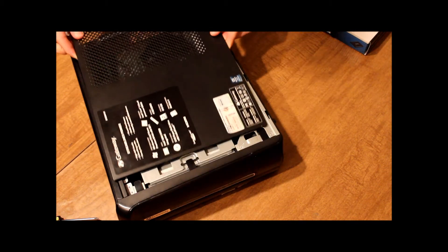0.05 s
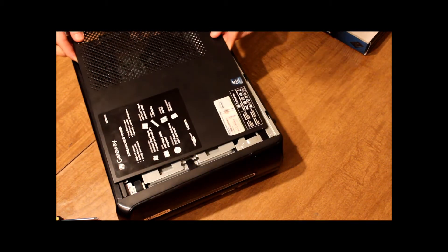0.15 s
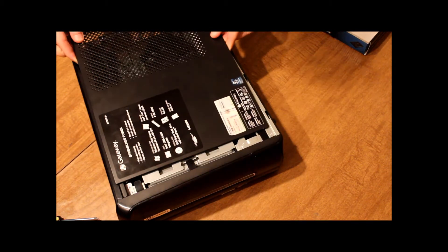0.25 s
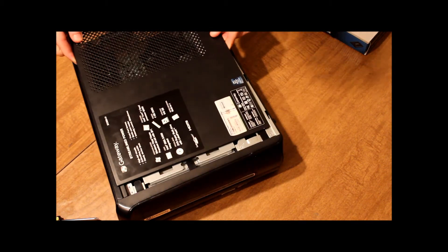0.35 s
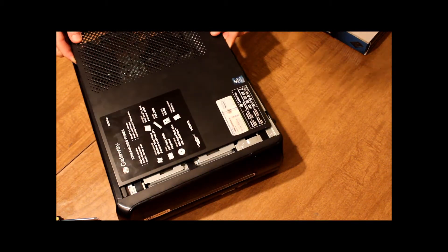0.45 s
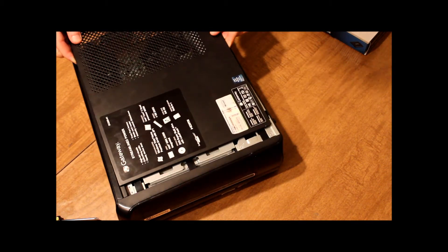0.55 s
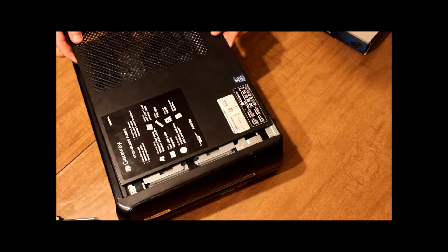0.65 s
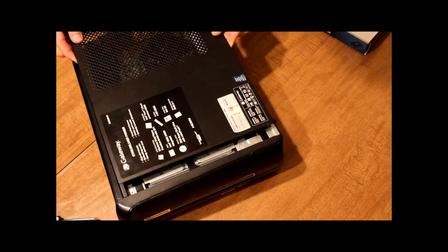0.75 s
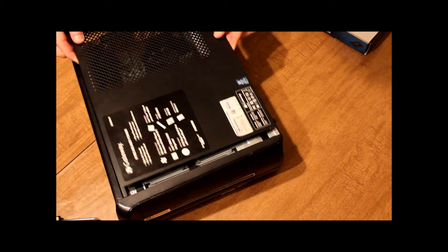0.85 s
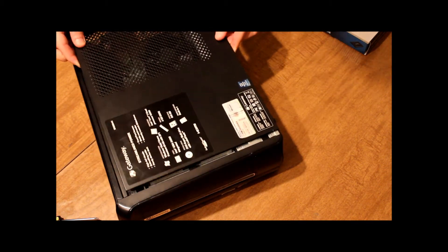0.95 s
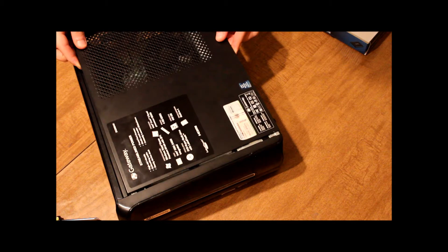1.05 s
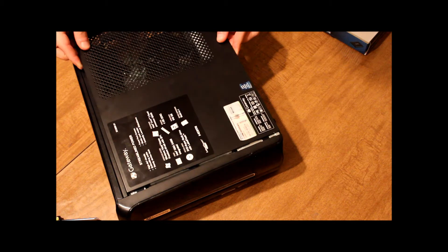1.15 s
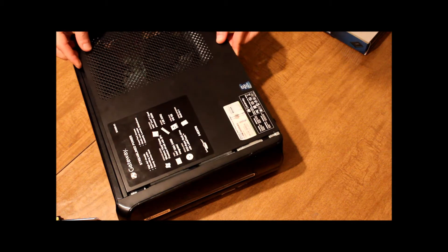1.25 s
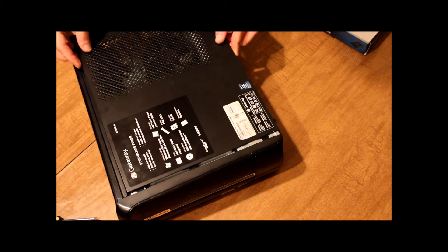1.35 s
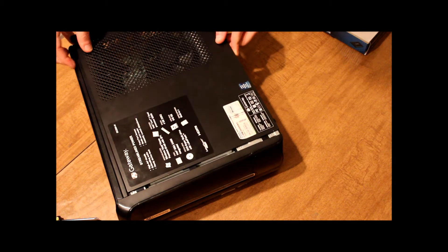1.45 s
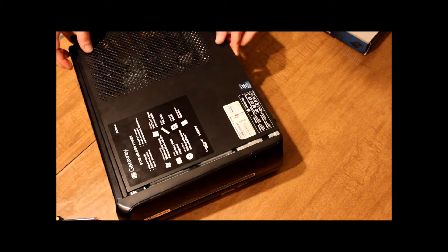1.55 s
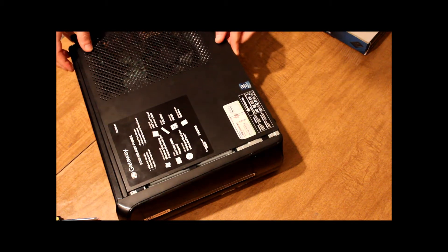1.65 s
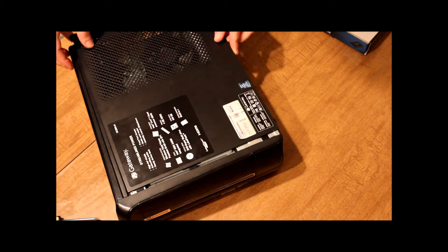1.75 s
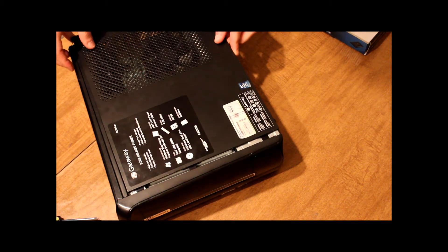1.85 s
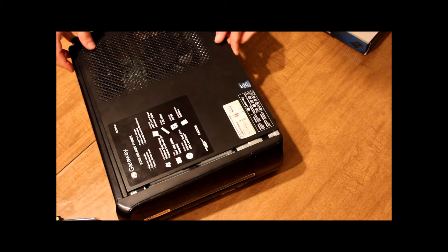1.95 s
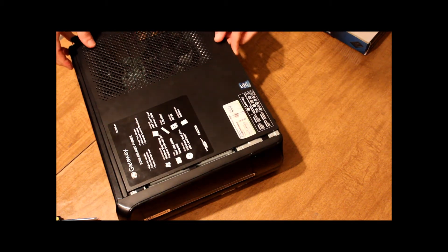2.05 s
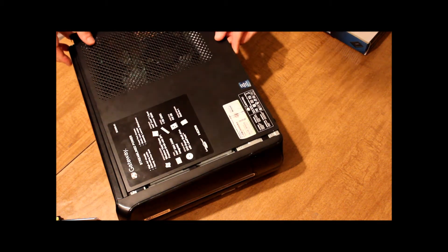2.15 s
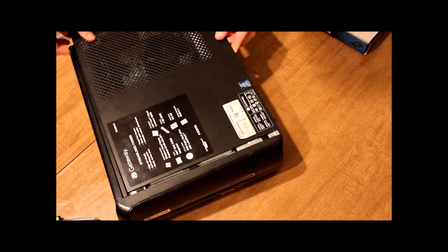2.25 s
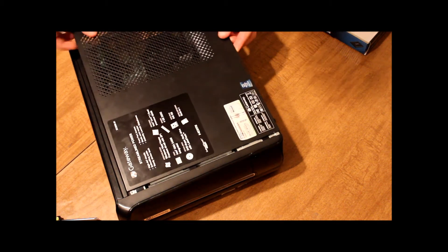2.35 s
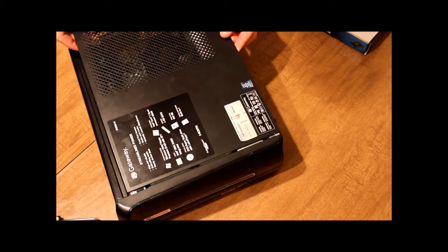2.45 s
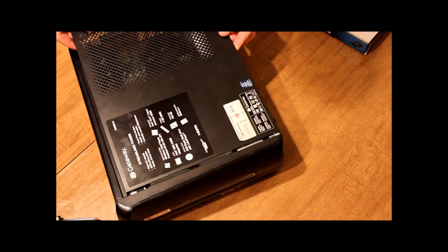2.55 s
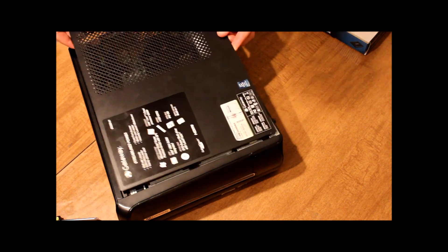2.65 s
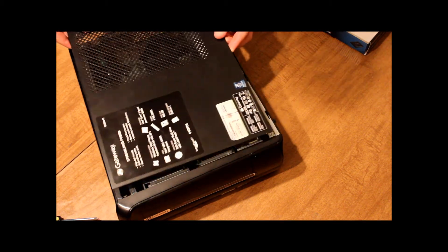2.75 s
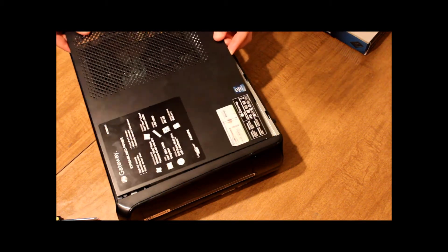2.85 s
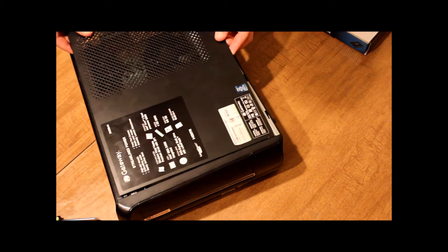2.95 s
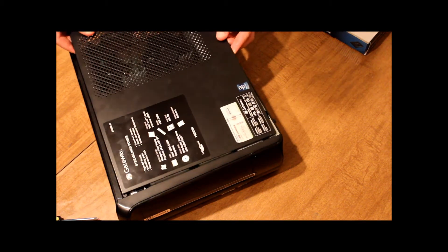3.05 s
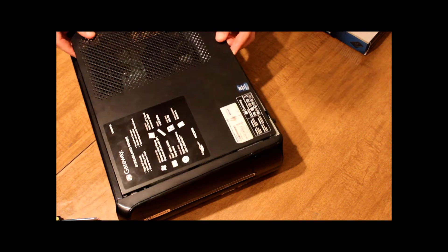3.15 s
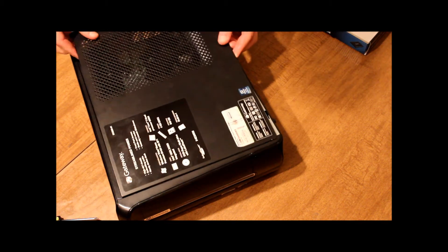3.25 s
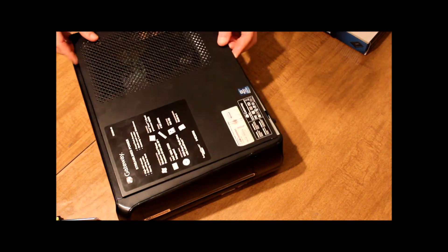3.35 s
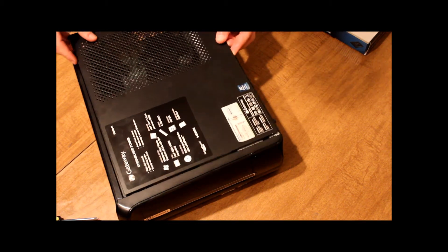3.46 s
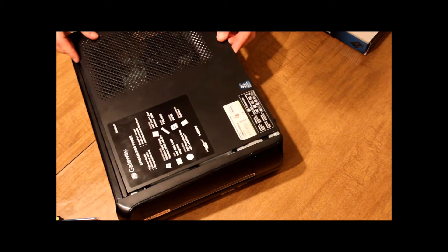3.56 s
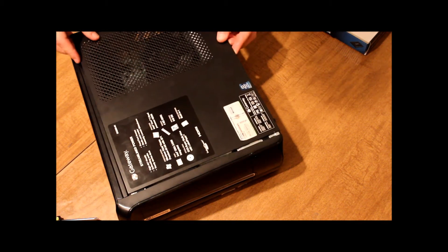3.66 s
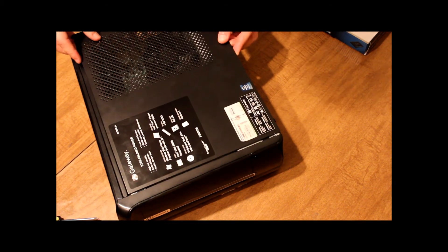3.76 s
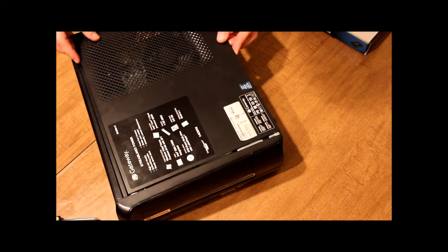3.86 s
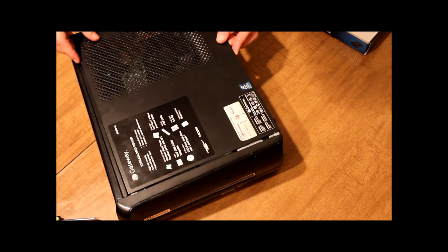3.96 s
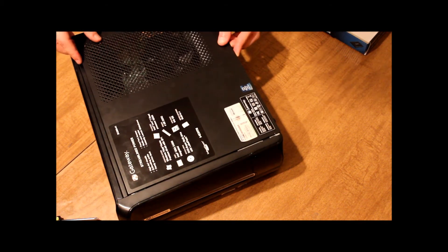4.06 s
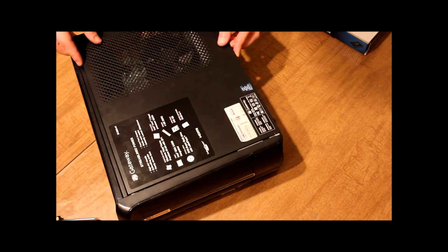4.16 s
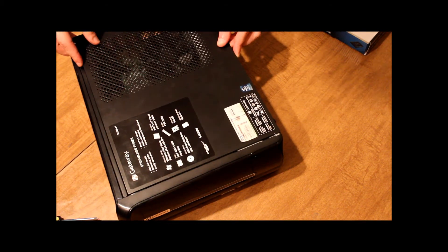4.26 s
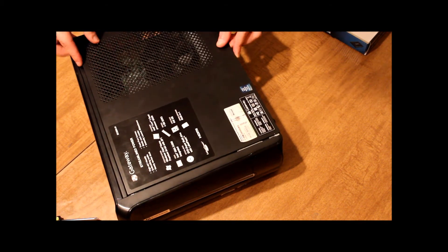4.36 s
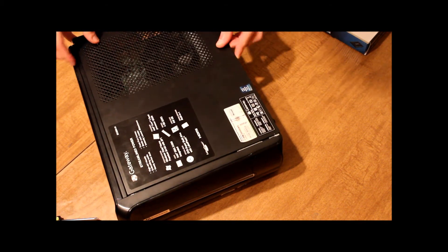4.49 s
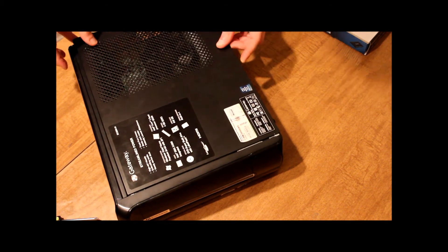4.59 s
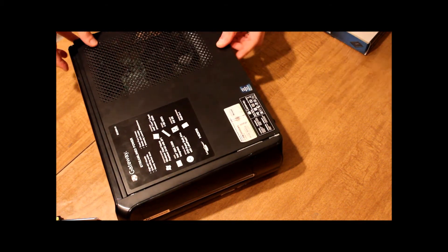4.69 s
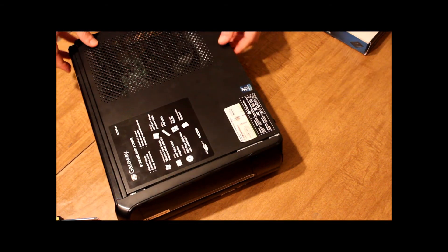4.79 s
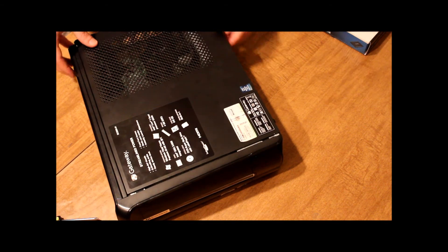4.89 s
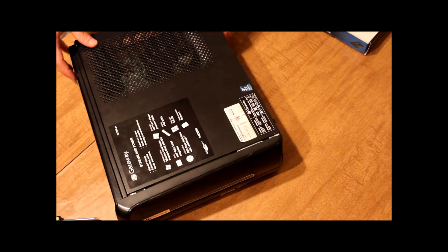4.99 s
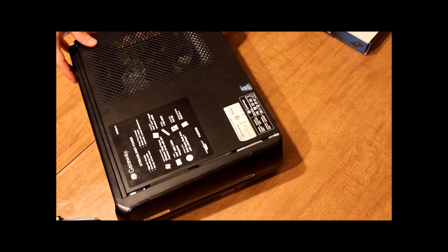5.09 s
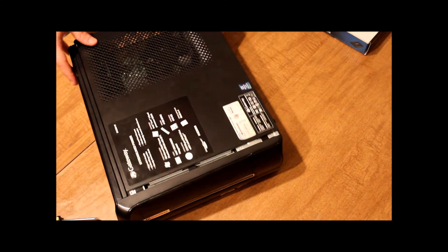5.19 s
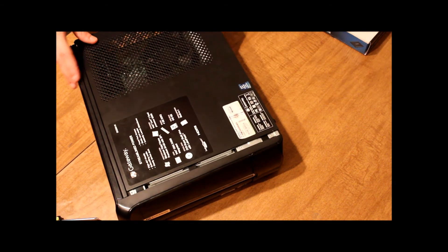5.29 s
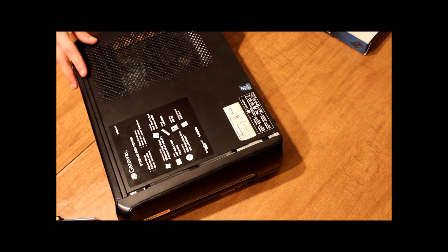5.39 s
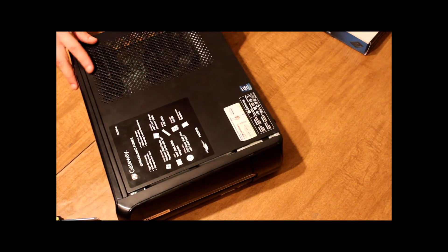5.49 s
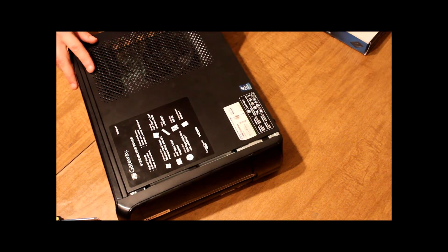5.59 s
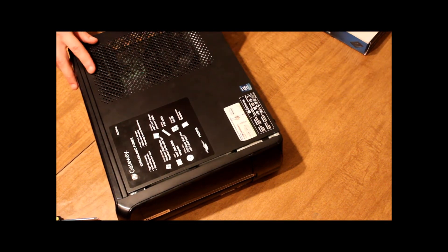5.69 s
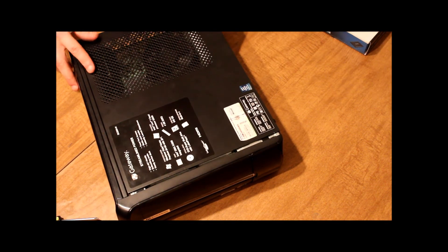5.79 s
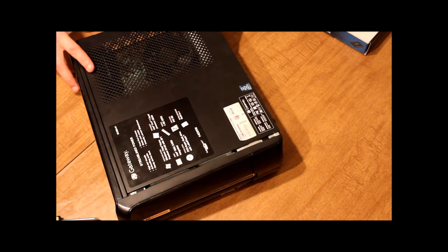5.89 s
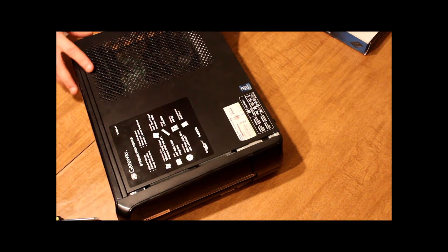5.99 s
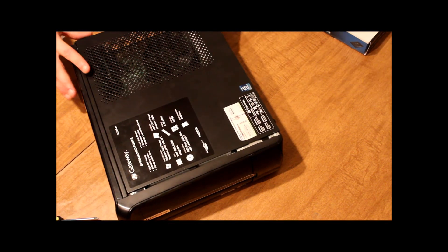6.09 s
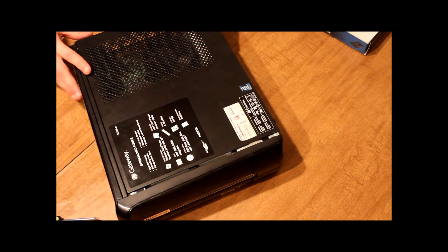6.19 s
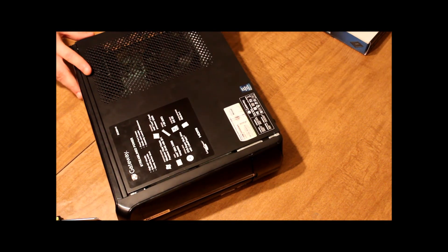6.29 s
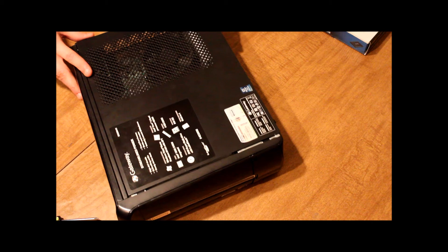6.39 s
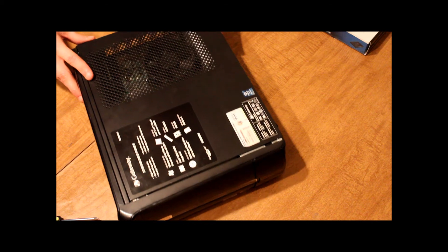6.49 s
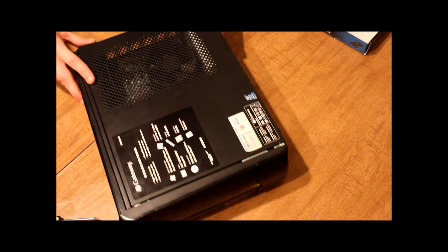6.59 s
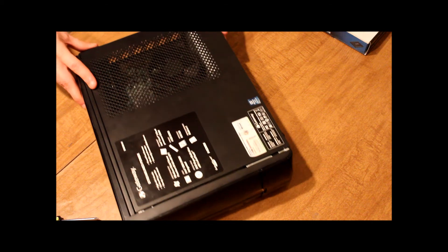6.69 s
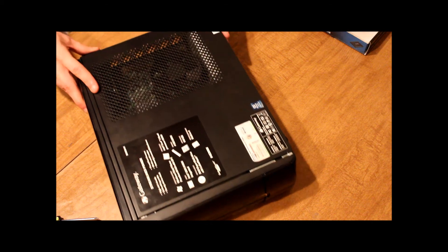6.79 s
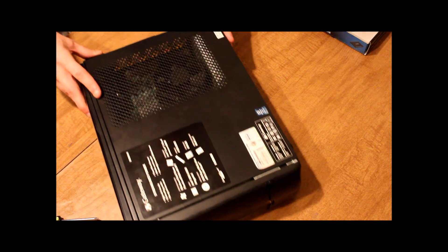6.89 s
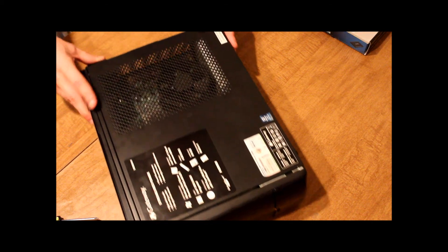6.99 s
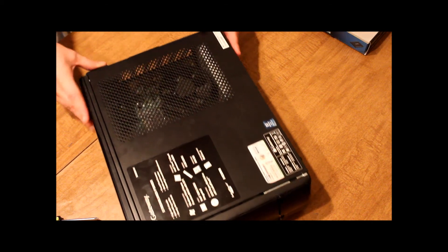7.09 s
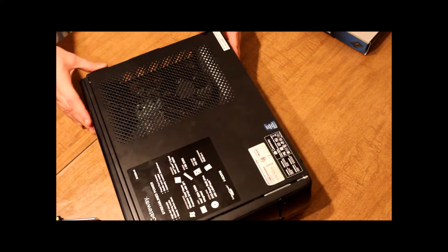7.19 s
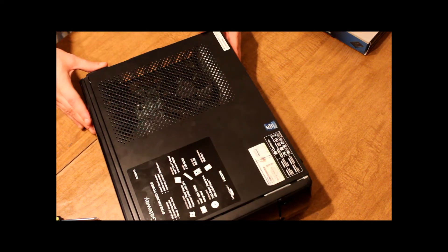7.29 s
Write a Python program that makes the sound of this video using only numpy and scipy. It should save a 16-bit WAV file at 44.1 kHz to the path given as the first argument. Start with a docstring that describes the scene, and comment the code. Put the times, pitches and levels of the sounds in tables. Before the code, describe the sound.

A small room with a soft steady wash, faint hum and deep drone, heard close to a wooden table. From 0.2 to 0.4 s a thin steel panel gives several light clacks against a hollow metal case, then fainter taps. Firmer knocks come at 1.0 and 1.15 s, a bright hard pair at 1.5 s with a short scrape, and another at 1.8 s. Smaller bumps and rattles run from 2.2 to 2.7 s. A strong double clack with low thump lands at 3.0 s, followed by gritty edge scraping, then a dense burst around 3.6-3.7 s. One soft knock at 4.1 s, then solid clunks at 4.9 s and the loudest, sharpest snap at 5.3 s. Only faint taps follow until 6.5 s, when the case turns, its feet juddering in low throbs with hissing rubbing, fading by 7.3 s. Rings are short and hand-damped, with brief room echo.

```python
"""A small room: on a wooden table a steel side panel is set on its computer case, knocked and slid into place.
Then the case is turned on the table. Each contact is a chattering noise burst that rings listed modes and
shakes the sheet, split into six bands; edge strokes and rubbing are coloured noise, the turning feet a throbbing
judder. Decaying random taps make the room's answer; a steady wash, hums and a deep drone lie underneath."""
import sys
import numpy as np
from scipy import signal
from scipy.fft import rfft, irfft, next_fast_len
from scipy.io import wavfile
from scipy.ndimage import uniform_filter1d

SR = 44100
rng = np.random.default_rng(int(sys.argv[2]) if len(sys.argv) > 2 else 0)


def to_wav(s):
    """Save 16-bit WAV."""
    ch = np.atleast_2d(s).T  # columns
    pcm = np.round(np.clip(ch, -1, 1) * 32767)  # PCM
    wavfile.write(sys.argv[1], SR, pcm.astype(np.int16))


N = 323605

# band edges of thud, boom, ring, clank, crack, tick: edge_hz
PART_EDGES_HZ = [45, 150, 450, 900, 3000, 8000, 16500]


def gain_of(db):
    """Decibels to an amplitude factor."""
    return 10 ** (np.asarray(db) / 20)


def evened(x):
    """Scales to rms 1."""
    return x / np.sqrt(np.mean(x ** 2) + 1e-20)


def unit(spectra):
    """Scales each row to energy 1."""
    return spectra / np.linalg.norm(spectra, axis=-1, keepdims=True)


def smooth_noise(size):
    """Noise under a moving average of size samples."""
    return uniform_filter1d(rng.standard_normal(N), size)


def read(points, hz):
    """Interpolates a table on a log-frequency axis."""
    f, value = np.transpose(points)
    return np.interp(np.log(hz + 1), np.log(f + 1), value)


def add(mix, s, sound):
    """Mixes a sound in at s seconds."""
    part = mix[round(s * SR):][:len(sound)]
    part += sound[:len(part)]


def coloured(x, points):
    """Filters x by the table's spectrum; rms 1."""
    size = next_fast_len(len(x))
    gains = gain_of(read(points, np.fft.rfftfreq(size, 1 / SR)))
    return evened(irfft(rfft(x, size) * gains, size)[:len(x)])


def grit(points, rows, rough_db):
    """Friction: coloured noise with an uneven grain, its level following rows (s, dB)."""
    s, db = np.transpose(rows)
    grain = gain_of(rough_db * evened(smooth_noise(200)))
    level = gain_of(np.interp(np.arange(N) / SR, s, db, -120, -120))
    return level * grain * coloured(rng.standard_normal(N), points)


def resonate(x, hz, width_hz):
    """Two-pole resonance: pole radius sets the width, pole angle the pitch."""
    r = np.exp(-np.pi * width_hz / SR)
    return signal.lfilter([1 - r], [1, -2 * r * np.cos(2 * np.pi * hz / SR), r * r], x)


def room_tone():
    """A steady wash of noise, hums of narrowly resonated noise and a wavering sine drone."""
    # wash spectrum: freq_hz, relative_density_db
    wash_spectrum = [(29, -36), (50, -11.5), (167, -7.5), (276, -6.5), (319, -14), (360, -3), (397, -13),
                     (447, -16), (583, -9.5), (922, -13.5), (1570, -19), (1720, -20.5), (2660, -26.5),
                     (3000, -28.5), (15800, -37)]
    # hums: pitch_hz, width_hz, rms_db
    hum_rows = [(126, 9.5, -74.5), (177, 6.4, -96), (353, 6.5, -84), (523.3, 18, -56.5)]
    wash_db, drone_hz, drone_db = -45, 26.8, -51.5
    wash = gain_of(wash_db) * coloured(rng.standard_normal(N), wash_spectrum)
    waver = 1 + 0.25 * evened(smooth_noise(900))
    sine = np.sin(2 * np.pi * drone_hz * np.arange(N) / SR)
    drone = gain_of(drone_db) * np.sqrt(2) * waver * sine
    hums = sum(gain_of(db) * evened(resonate(rng.standard_normal(N), hz, width_hz))
               for hz, width_hz, db in hum_rows)
    return wash + drone + hums


def part_levels(strength_db, weight_db, flat_db, sharp_db):
    """Band levels of a contact: the thud follows its weight, the tick its sharpness."""
    clank_db = -6.5  # clank rms over 20 ms, against its peak
    thud_db = -19.5 + 1.3 * weight_db
    tick_db = -8.5 + 1.2 * sharp_db
    return strength_db + clank_db + np.array([thud_db, weight_db, flat_db, 0, sharp_db, tick_db])


def contacts():
    """Rows (s, chatter ms, six band gains, sharpness dB): knocks fill all bands, jolts and ticks one each."""
    # knocks: start_s, clank_peak_db, then against the clank weight_db (table and case),
    # flatness_db (panel ring), sharpness_db (crack); chatter_ms
    knock_rows = [(0.1817, -27, 0.5, 9, -3.5, 7.8), (0.189, -16.5, -5.5, 2.5, -9.5, 3.5),
                  (0.2637, -23.5, -5, 2.5, -10, 5), (0.294, -26, -4.5, -9, -11, 5.6),
                  (0.3731, -25.5, 1, 4, -20, 5), (0.3949, -34.5, 9, -10, -16, 4.6),
                  (0.7332, -32.5, 5.5, 6.5, -16, 5.8), (0.7587, -37.5, -1, 10.5, -20, 7.6),
                  (0.9888, -16.5, -4, 4, -9.5, 6.2), (1.0194, -31.5, -11, 8, -16, 4.7),
                  (1.0754, -32, -1, -11, -7, 5), (1.1309, -29, -4, -22, -9, 5.6),
                  (1.1403, -17.5, -7, 3, -7.5, 6.6), (1.171, -21.5, 5, 5, -8, 5),
                  (1.1792, -22.5, 1.5, 8.5, -10, 3.7), (1.2132, -23.5, -4, -2.5, -7.5, 3.8),
                  (1.2424, -35, 7, 2, -24, 3.6), (1.3139, -29, -7, -6, -9.5, 13),
                  (1.396, -38, 2, 5.5, -24, 5), (1.496, -25, 3.5, -11, -9, 15),
                  (1.5193, -11, -3.5, -6.5, -5.5, 5), (1.5302, -12, -2.5, -10, -11, 8.5),
                  (1.5578, -22, -7, -7, -9, 4.3), (1.7854, -13.5, -6.5, 0, -12.5, 5.8),
                  (1.8082, -19.5, -1, 4.5, -25, 8.3), (1.8951, -31, 2, -12, -13, 7.3),
                  (2.1816, -22, -8, -9.5, -7.5, 5.7), (2.1955, -20, -6.5, -3, -13.5, 8.3),
                  (2.2906, -25.5, -6, -5, -6, 8.7), (2.3443, -30.5, 6.5, 10, -34, 4.2),
                  (2.4528, -35, 5, 9, -31, 2.5), (2.5114, -43, 10, 6, -15, 3.9),
                  (2.612, -19.5, -3, 0.5, -16, 4.1), (2.6798, -24.5, -6.5, 1, -10.5, 6.5),
                  (2.9576, -10.5, -2, -5.5, -7, 5.7), (2.9711, -14, -5, -2, -29, 2),
                  (2.9989, -29, -13, 12.5, -20, 5), (3.0344, -35, 3, 13, -17, 6.1),
                  (3.0671, -19, -10, 4.5, -20, 3.4), (3.0968, -20.5, -7.5, 6.5, -19, 5.6),
                  (3.1199, -27, 0, -1.5, -24, 3.2), (3.3093, -32.5, -2, 6.5, -13, 7.7),
                  (3.5148, -35.5, -5, 5, -12.5, 5), (3.5417, -35.5, 7, 6.5, -11, 4.5),
                  (3.6098, -15, -7, 0.5, -7.5, 6.6), (3.645, -19, -1, 4, -7, 6.1),
                  (3.6654, -15, -2.5, -6.5, -2.5, 5), (3.6846, -12, -6.5, -9.5, -5.5, 3.8),
                  (3.693, -13.5, -14, -4.5, -4.5, 4.6), (3.7337, -20, 0.5, 0.5, -4.5, 9.8),
                  (4.137, -27.5, 3, 6.5, -16.5, 5.6), (4.8761, -28.5, 4, -5, -4, 2.4),
                  (4.8803, -18, 2, -10, -11, 6), (4.8935, -12, -8, 7, -5, 6.5),
                  (4.9038, -9.5, -6, 0.5, -9, 9.1), (4.9487, -23.5, -1, 6.5, -17, 5),
                  (5.2962, -21.5, -6, 4, -11.5, 6.8), (5.3064, -12.5, -8, -0.5, -1, 3.6),
                  (5.3126, -8.5, -1.5, -0.5, -8, 3.4), (5.3216, -5.5, -10, -5.5, -9.5, 4.7),
                  (5.663, -32, 8, 7, -35, 9.8), (5.9084, -44, -11, 3, -9, 5),
                  (6.188, -28.5, 1, -16, -15.5, 11), (6.3415, -45, 3, 7.5, -13, 4)]
    # whole case jolting on the table: start_s, thud_db
    jolt_rows = [(0.394, -44), (1.18, -47), (2.201, -45), (2.96, -34), (3.099, -38), (3.646, -43),
                 (3.666, -37.5), (4.882, -39), (4.895, -33), (5.663, -47)]
    # added high ticks, mostly on top of a knock: start_s, tick_db
    tick_rows = [(.187, -42), (.266, -46), (.989, -35.5), (1.076, -49), (1.213, -51), (1.518, -32),
                 (1.559, -46), (1.785, -36.5), (2.181, -44), (2.61, -46), (2.681, -49), (2.959, -29.5),
                 (3.61, -36), (3.685, -28), (4.895, -29), (4.905, -30), (5.321, -30), (1.171, -39),
                 (2.971, -33), (3.066, -40.5), (3.099, -40), (3.667, -26.5), (5.306, -18), (5.909, -57),
                 (6.342, -51)]
    jolt_ms, tick_ms = 5.2, 2.3
    only = np.eye(6)
    return ([(s, ms, gain_of(part_levels(*db)), db[-1]) for s, *db, ms in knock_rows]
            + [(s, jolt_ms, only[0] * gain_of(db), 0) for s, db in jolt_rows]
            + [(s, tick_ms, only[5] * gain_of(db), 0) for s, db in tick_rows])


def dulled(spectra, sharp_db, hz):
    """A blunt contact loses more of the treble above the panel ring."""
    dulling = 0.082  # dB per octave for each dB of bluntness
    octaves = np.log2(np.maximum(hz / PART_EDGES_HZ[3], 1))
    return spectra * gain_of(dulling * sharp_db * octaves)


def knocks():
    """A short chattering contact rings the listed modes and shakes the sheet; each band takes its own share."""
    # modes of case and panel: pitch_hz, level_db, t60_s (before the hand damping below)
    mode_rows = [(67, 8.5, 0.18), (132, -8, 0.11), (235, -19, 0.39), (246.5, -1, 0.31), (321.8, 5, 0.3),
                 (348.3, -1, .16), (414, -1.5, 0.48), (517.5, -6.5, 0.48), (542.2, 9, 0.2), (608, 4, 0.089),
                 (605, -2.5, 0.31), (698.7, -9, 0.36), (738, -15.5, 0.27), (840, -24.5, 0.028),
                 (953, -20.5, 0.16), (1068, -17, 0.032), (1140.5, -12.5, 0.3), (1369, -16.5, 0.15),
                 (1570, -0.5, 0.018), (1802, -6.5, 0.053), (2130, -39, 0.064), (2540, -50, 0.059),
                 (2780, -41, 0.14), (3000, -48, 0.06), (4500, -21, .05)]
    # small modes and rattles per band: t60_s (held to 0.3 below), level_db against the chatter,
    # listed_modes_db
    sheet_rows = [(0.11, 9, 6), (0.37, -8, 4.5), (0.13, 22, 9), (0.16, 33, 4.5), (0.069, -4, -6),
                  (0.031, -1, -33)]
    size = 16384
    spot_db = 3  # spread of each mode's level with the struck spot
    tilt_db = -4.5  # per octave, on all bands but the tick
    rise_s = 0.0024  # the shaking takes a moment to spread over the sheet
    hz, t, out = np.fft.rfftfreq(size, 1 / SR), np.arange(size) / SR, np.zeros(N)

    modes = []
    for pitch_hz, db, t60_s in mode_rows:
        decay = gain_of(-60 * t / np.clip(t60_s, 0.02, 0.14))  # hands damp the panel
        modes.append(gain_of(db) * rfft(decay * np.sin(2 * np.pi * pitch_hz * t)))
    modes = np.array(modes)

    parts = []
    for edges in zip(PART_EDGES_HZ, PART_EDGES_HZ[1:]):
        band = signal.butter(3, edges, "band", fs=SR, output="sos")
        parts.append(signal.sosfreqz(band, hz, fs=SR)[1])
    parts = np.array(parts)
    parts[:-1] *= gain_of(tilt_db * np.log2(hz + 100))

    t60_s, tail_db, modes_db = np.transpose(sheet_rows)[:, :, None]
    tails = gain_of(tail_db - 60 * t / np.clip(t60_s, 0.02, 0.3))
    rise = 1 - np.exp(-t / rise_s)
    for s, ms, gains, sharp_db in contacts():
        noise = rng.standard_normal(size)
        spot = gain_of(spot_db * rng.standard_normal(len(modes)))
        chatter = np.exp(-t * 1000 / ms)
        rings = unit(parts * rfft(noise * chatter) * (spot @ modes))
        sheet = unit(parts * rfft(noise[::-1] * (chatter + tails) * rise))
        body = unit(dulled(sheet + gain_of(modes_db) * rings, sharp_db, hz))
        add(out, s, irfft(gains @ body) * np.sqrt(size * SR / 100))  # a unit band: rms 1 over 20 ms
    return out


def scrapes():
    """Panel edge stroking along its rails: gritty noise swelling towards a peak, then falling."""
    # strokes: start_s, peak_s, end_s, peak_db
    # an end before the peak cuts the swell short; an end before the start leaves the stroke silent
    stroke_rows = [(1.05, 1.204, 1.18, -47), (1.475, 1.523, 1.54, -45), (1.704, 1.769, 1.83, -48),
                   (2.99, 3.118, 3.16, -41.5), (3.417, 3.524, 3.7, -55), (4.05, 4.13, 3.8, -59)]
    # rail spectrum: freq_hz, relative_density_db
    rail_spectrum = [(1500, -30), (3000, 7), (6000, -2), (8000, 1), (11500, 3), (14000, -25), (15800, -12),
                     (16000, -40)]
    ends_db = -20  # against the peak
    out = np.zeros(N)
    for start_s, peak_s, end_s, db in stroke_rows:
        rows = [(start_s, db + ends_db), (peak_s, db), (end_s, db + ends_db)]
        out += grit(rail_spectrum, rows, rough_db=-0.5)
    return out


def slide():
    """The case turns: its feet stick and slip in throbs at an unsteady rate; the rubbing hisses."""
    # turning on the table: time_s, hiss_db, judder_db
    slide_rows = [(6.499, -49.5, -39), (6.546, -45, -51), (6.776, -41.5, -37), (6.882, -42.5, -43),
                  (7.114, -36.5, -38.5), (7.2, -42.5, -58), (7.262, -47.5, -63), (7.3, -64, -70)]
    # rubbing spectrum: freq_hz, relative_density_db
    rub_spectrum = [(45, -43), (70, -12.5), (200, -8.5), (280, -5), (375, -8.5), (420, -8.5), (810, -14.5),
                    (1110, -15.5), (1920, -21), (4340, -25), (7000, -27), (9500, -31), (12000, -31),
                    (13700, -30), (15800, -34)]
    slip_hz, slip_wobble, throb_db = 275, 0.0428, 5  # wobble (as a fraction) and throb are rms
    s, hiss_db, judder_db = np.transpose(slide_rows)
    wobble, throb = (evened(uniform_filter1d(smooth_noise(size), size)) for size in (150, 700))
    phase = 2 * np.pi * np.cumsum(slip_hz * (1 + slip_wobble * wobble)) / SR
    level = gain_of(np.interp(np.arange(N) / SR, s, judder_db, -120, -120) + throb_db * throb)
    judder = np.sin(phase) + 0.18 * np.sin(2 * phase) + 0.081 * np.sin(3 * phase)
    return grit(rub_spectrum, np.c_[s, hiss_db], rough_db=0.5) + level * judder


def dying(x, t60):
    """Each frequency of x dies at its own speed; energy 1."""
    hz, t, z = signal.stft(x, SR, nperseg=128)
    decay = gain_of(-60 * t / np.maximum(read(t60, hz), 0.01)[:, None])
    y = signal.istft(z * decay, SR, nperseg=128)[1][:len(x)]
    return y / np.linalg.norm(y)


def room(x):
    """Sparse random-sign taps after 4 ms; three random tails fade in and out in turn, so the echo keeps varying."""
    # room decay: freq_hz, t60_s
    room_t60 = [(100, 0.26), (260, 0.48), (700, 0.48), (1840, 0.46), (4850, 0.38), (16000, 0.21)]
    turn_hz = 9
    slots, out = np.arange(180, SR // 2 - 10, 10), np.zeros(N)
    for k in range(3):
        taps = np.zeros(SR // 2)
        taps[slots + rng.integers(0, 10, len(slots))] = rng.choice([-1., 1.], len(slots))
        turn = np.sqrt(2 / 3) * np.cos(2 * np.pi * (np.arange(N) / SR * turn_hz + k / 3))
        out += signal.oaconvolve(x * turn, dying(taps, room_t60))[:N]
    return out


def scene():
    """Knocks, scrapes and the turning case, with the room's answer and its tone."""
    room_db = -7.5
    near = knocks() + scrapes() + slide()
    return (near + gain_of(room_db) * room(near) + room_tone())[None]


def record(dry):
    """Treble colour with a steep drop at 16 kHz, then the band limit."""
    # treble colour: freq_hz, gain_db
    treble_colour = [(5000, 0.), (8000, -3.5), (10500, -2.5), (13500, 0), (15700, -1.5), (16100, -32)]
    edge_hz = 16900
    hz = np.linspace(0, SR / 2, 257)
    colour = signal.firwin2(255, hz, gain_of(read(treble_colour, hz)), fs=SR)
    low_pass = signal.firwin(511, edge_hz, window=("kaiser", 9), fs=SR)
    return signal.oaconvolve(dry, np.convolve(colour, low_pass)[None], "same")


dry = scene()
out = record(dry)
to_wav(out)
```